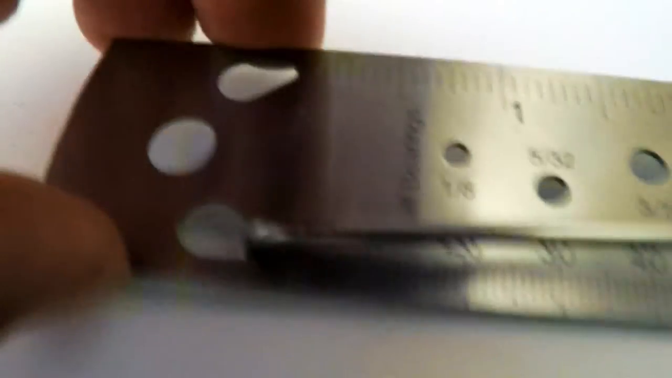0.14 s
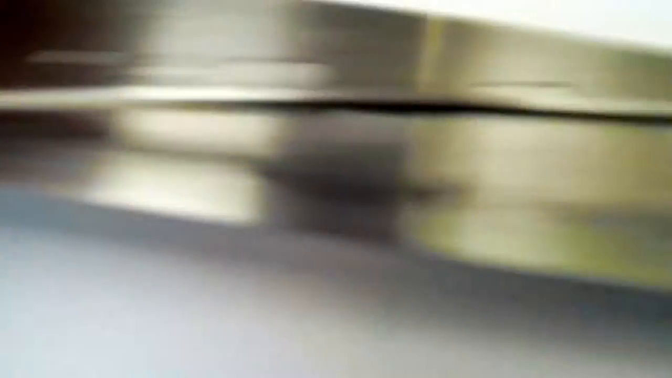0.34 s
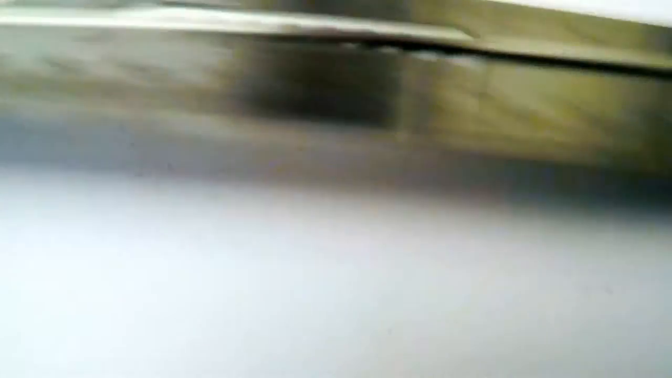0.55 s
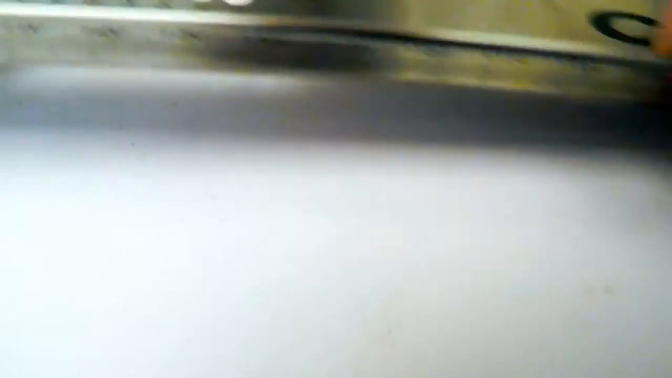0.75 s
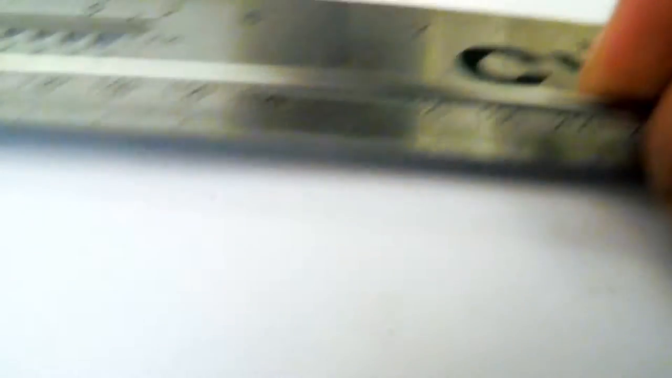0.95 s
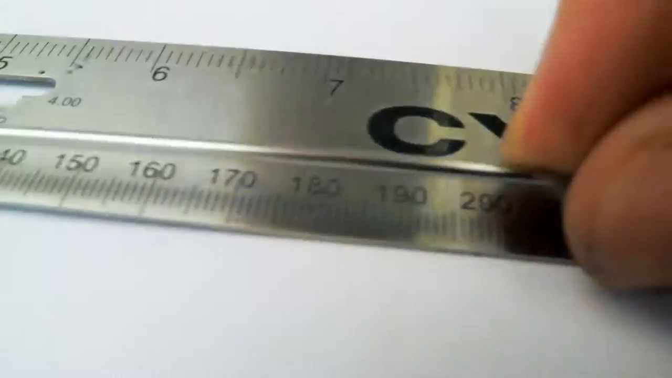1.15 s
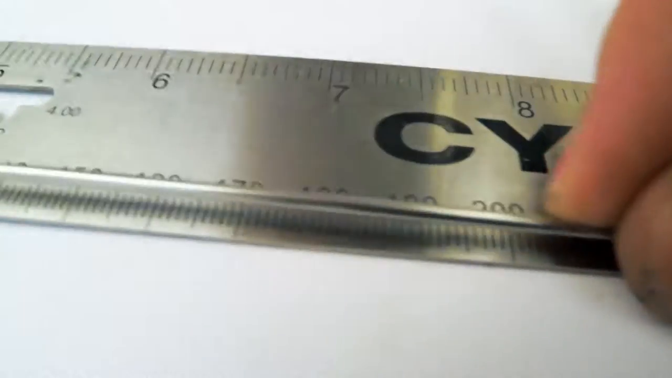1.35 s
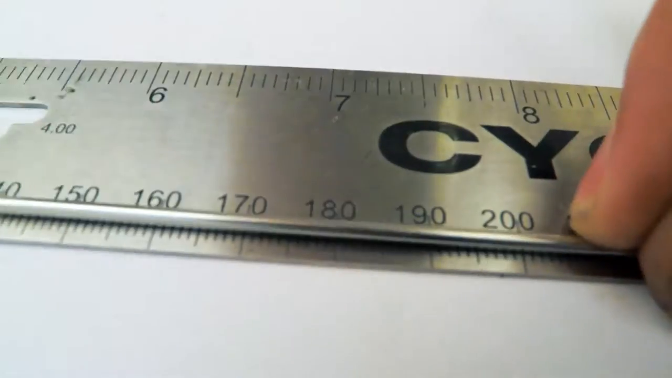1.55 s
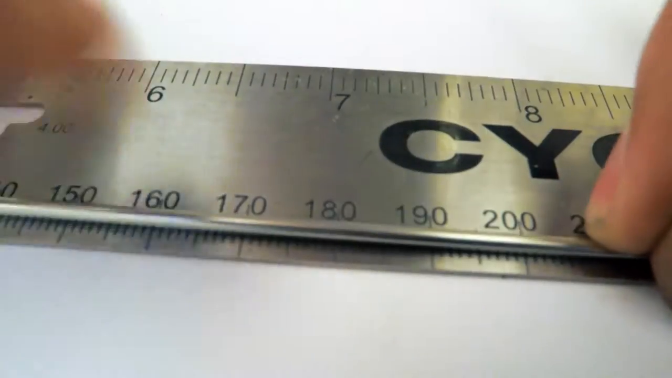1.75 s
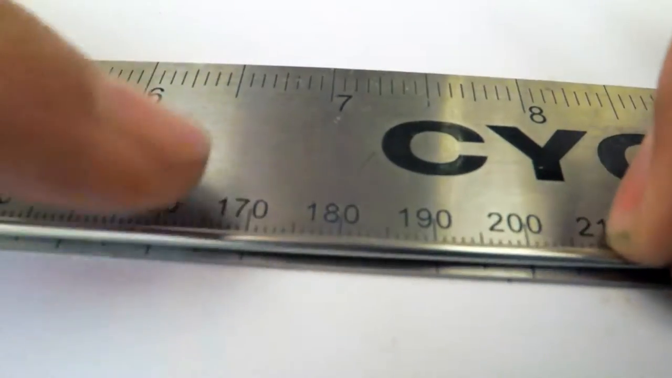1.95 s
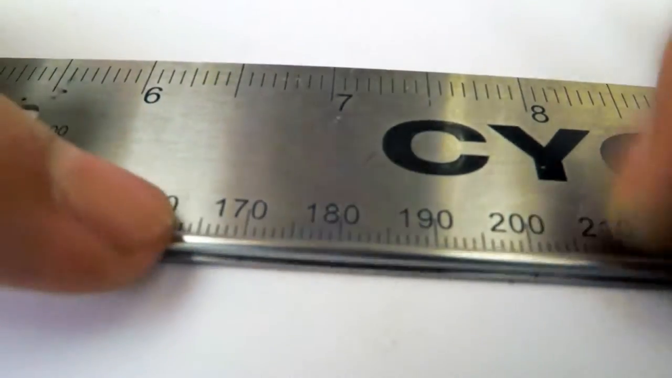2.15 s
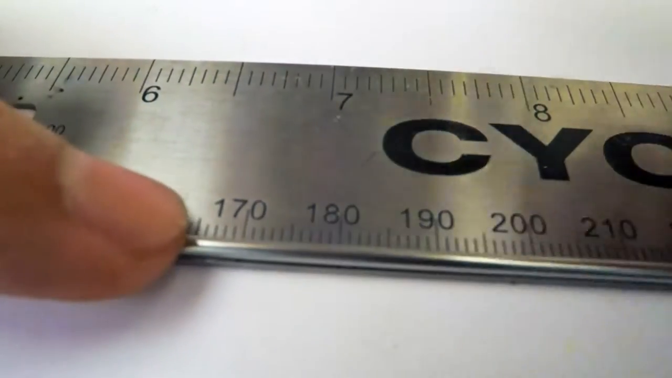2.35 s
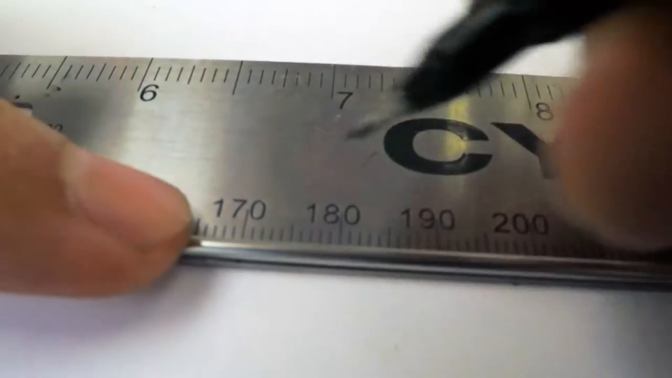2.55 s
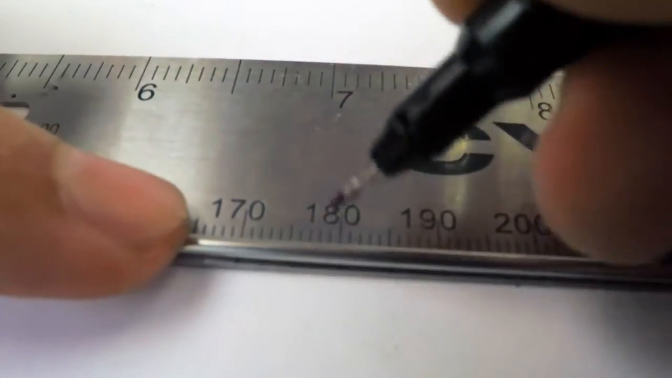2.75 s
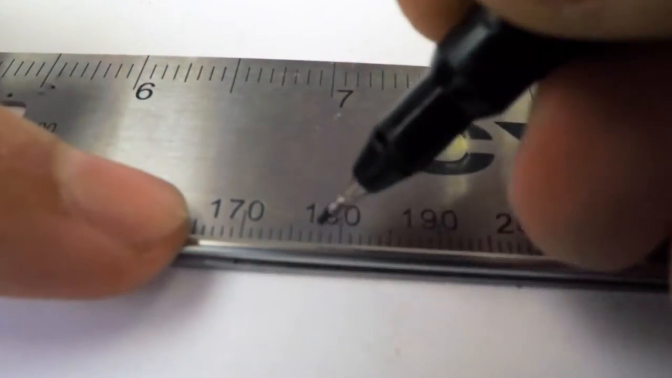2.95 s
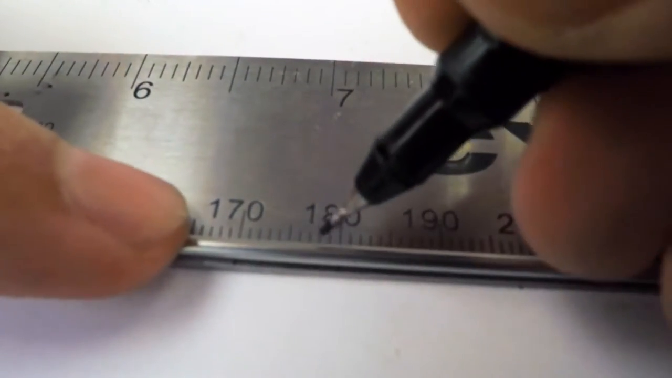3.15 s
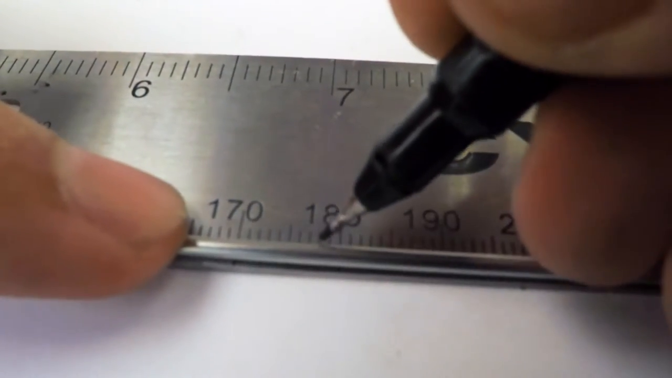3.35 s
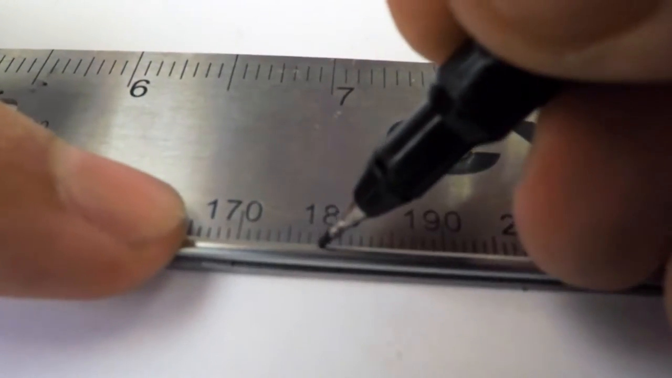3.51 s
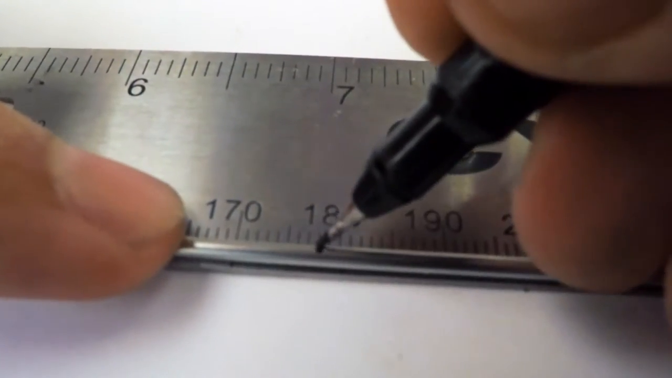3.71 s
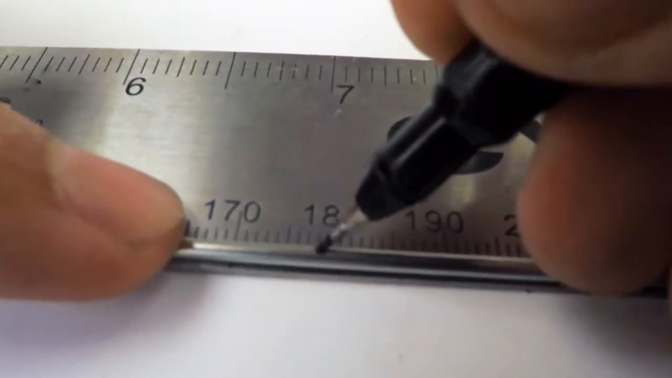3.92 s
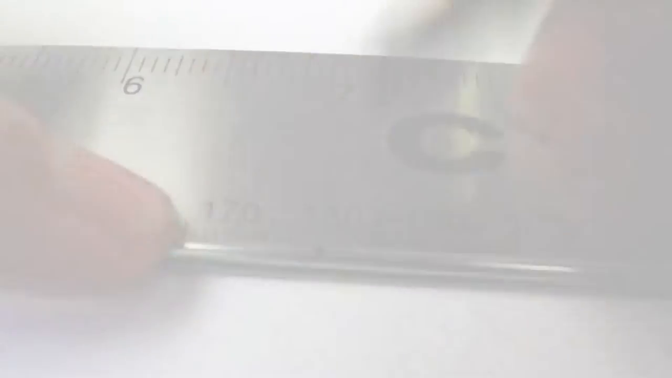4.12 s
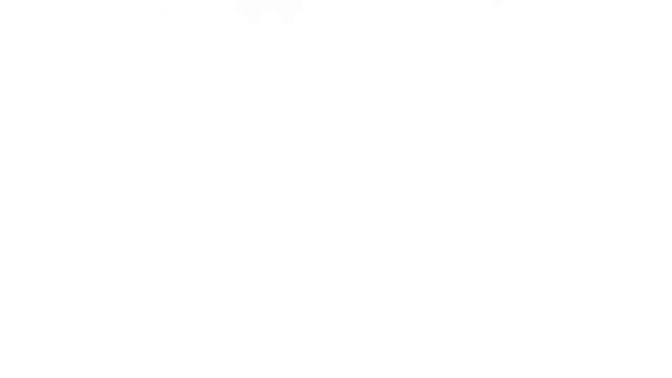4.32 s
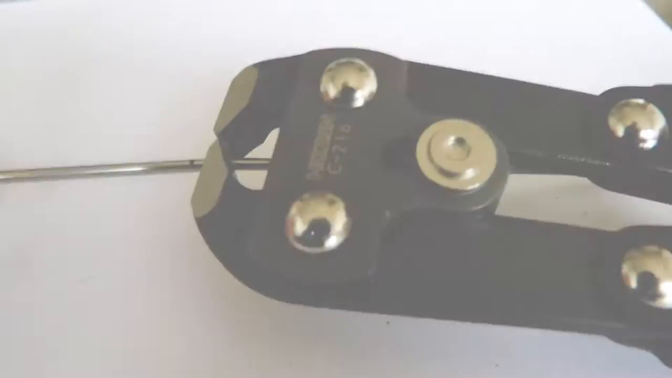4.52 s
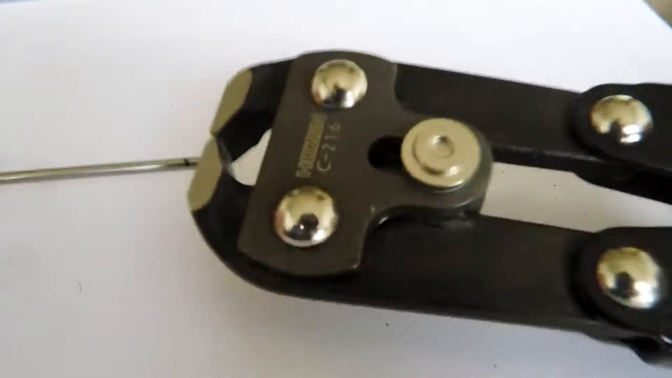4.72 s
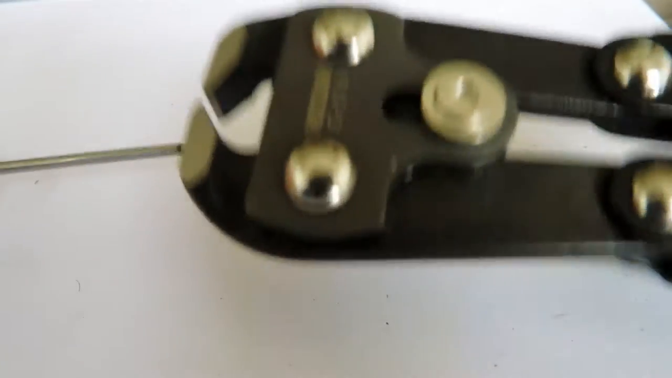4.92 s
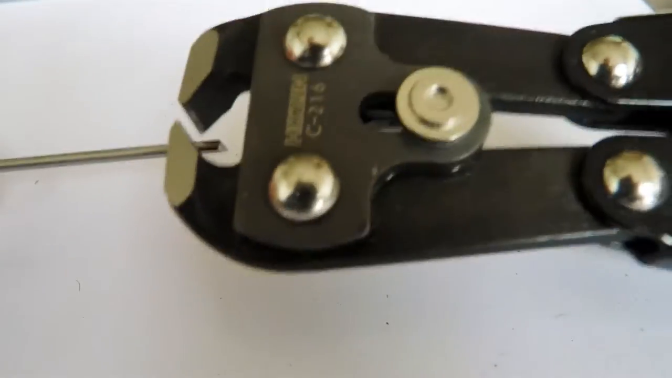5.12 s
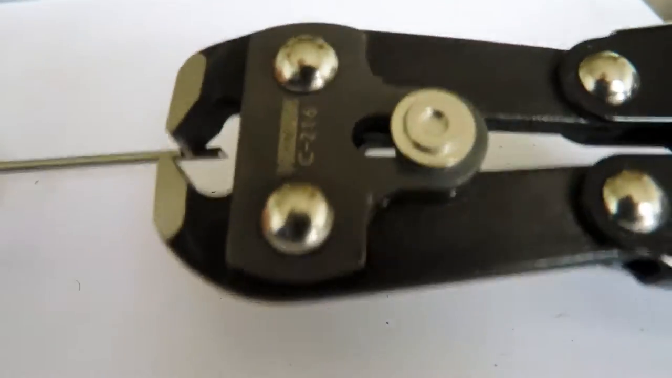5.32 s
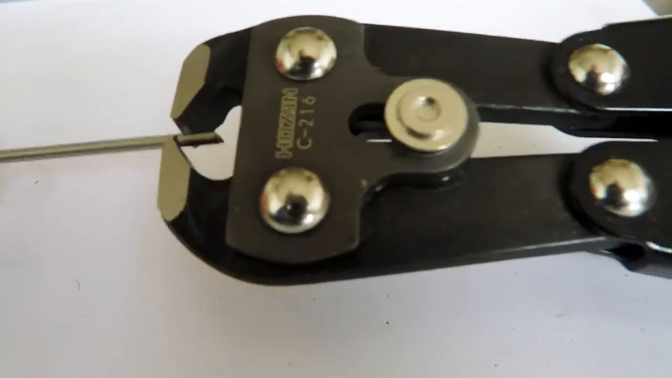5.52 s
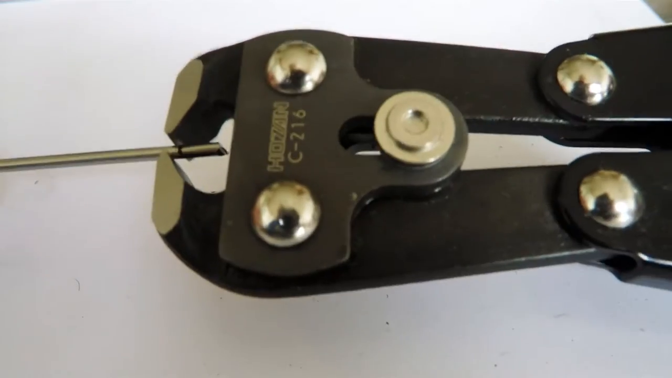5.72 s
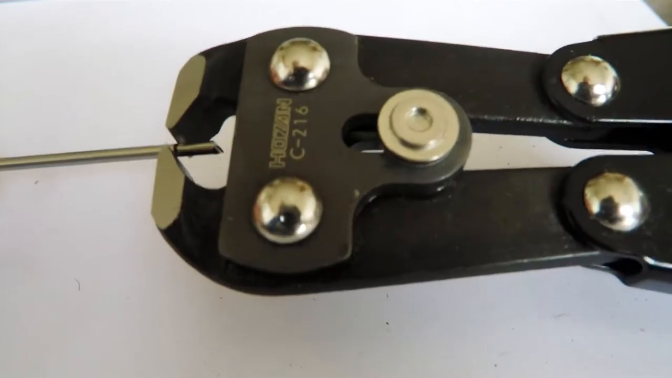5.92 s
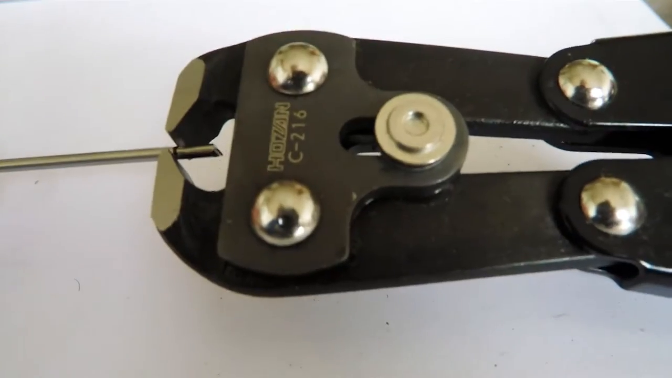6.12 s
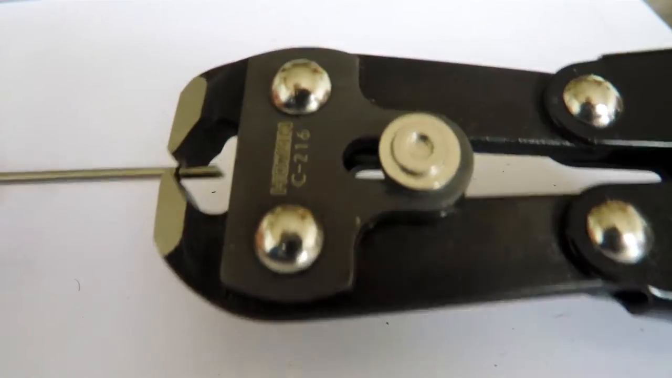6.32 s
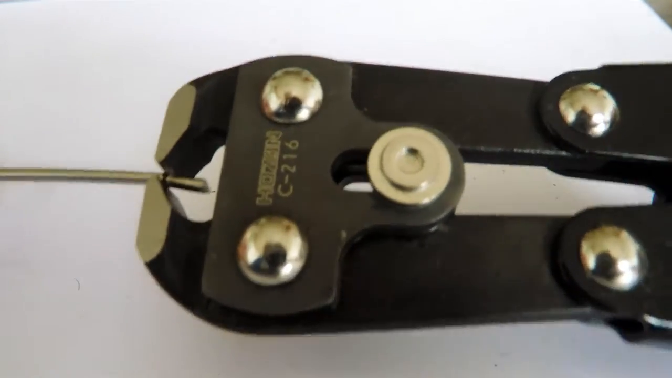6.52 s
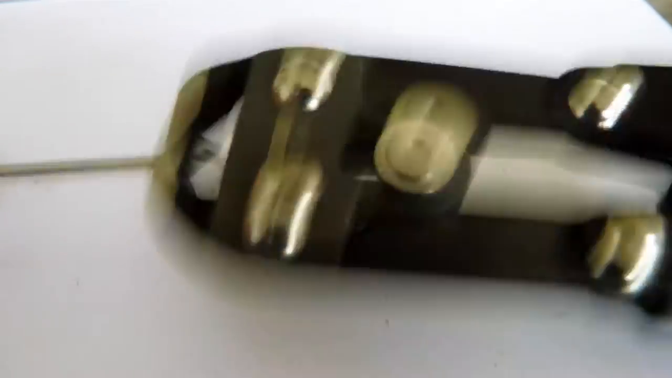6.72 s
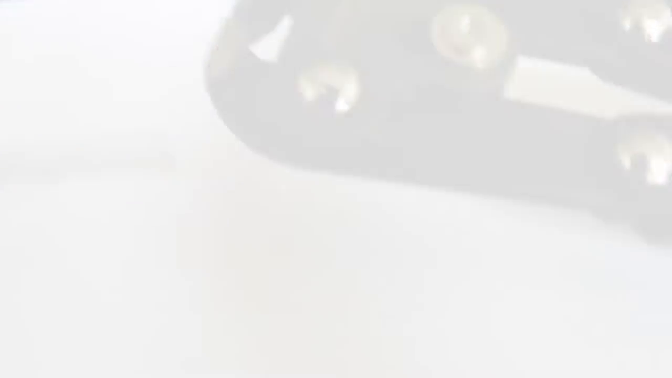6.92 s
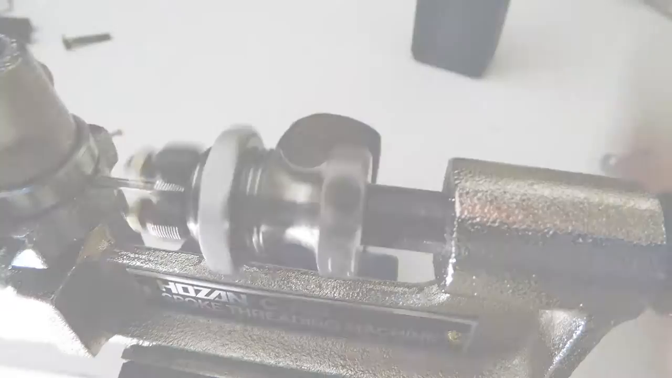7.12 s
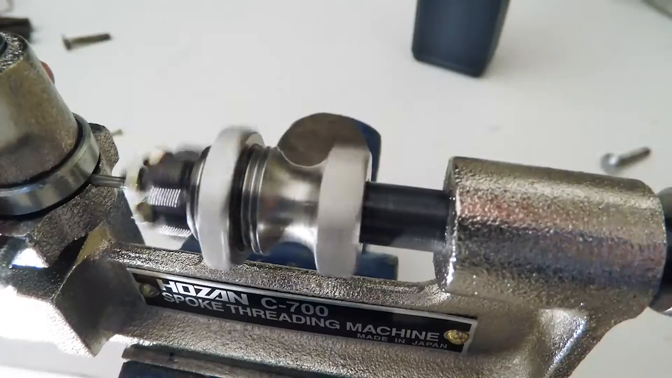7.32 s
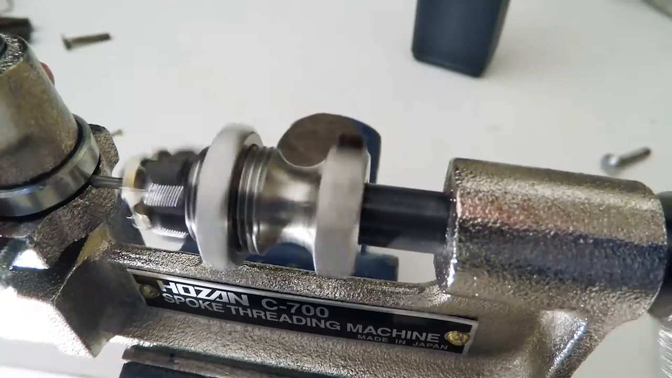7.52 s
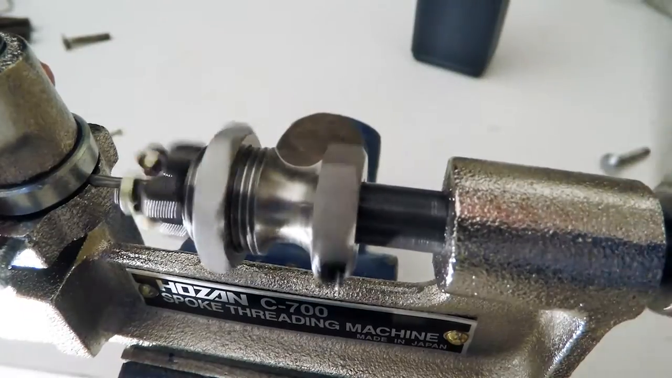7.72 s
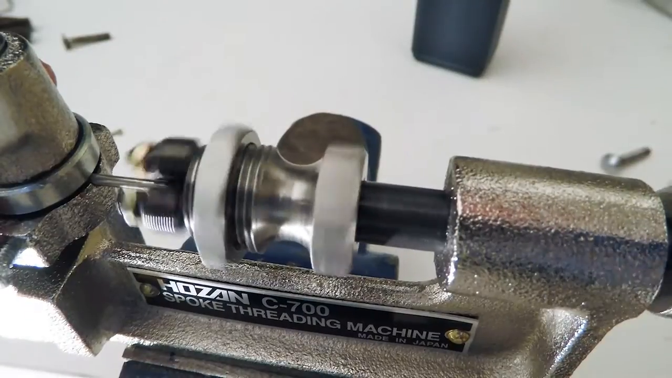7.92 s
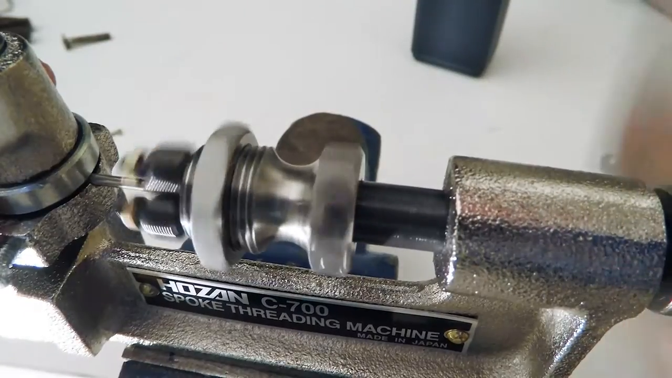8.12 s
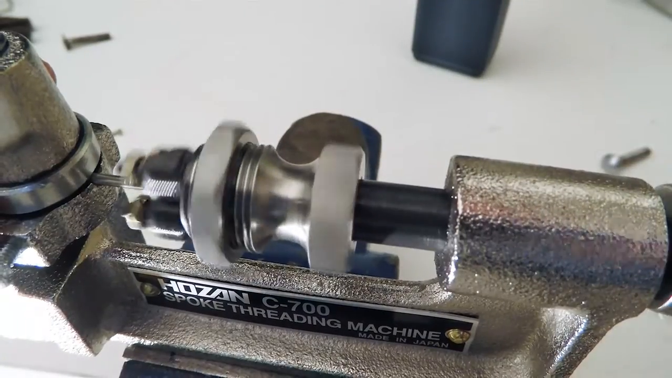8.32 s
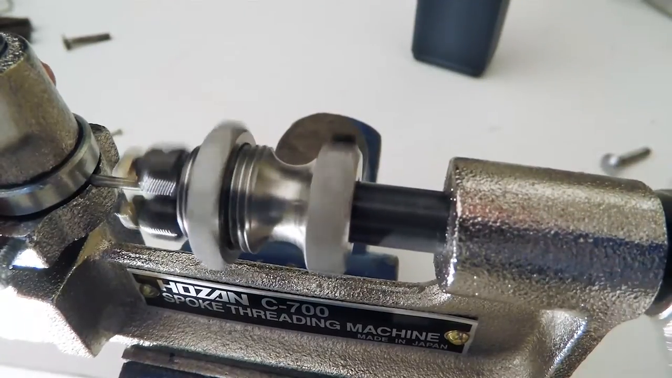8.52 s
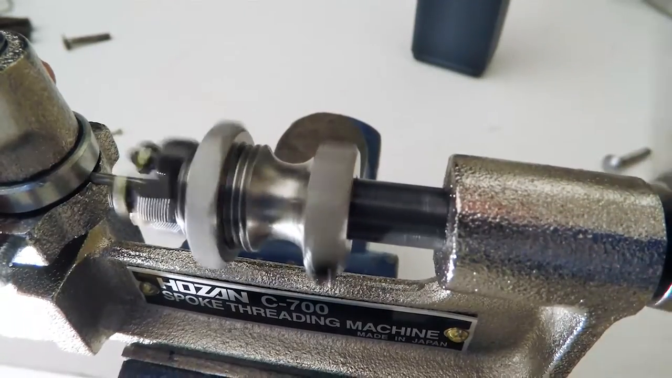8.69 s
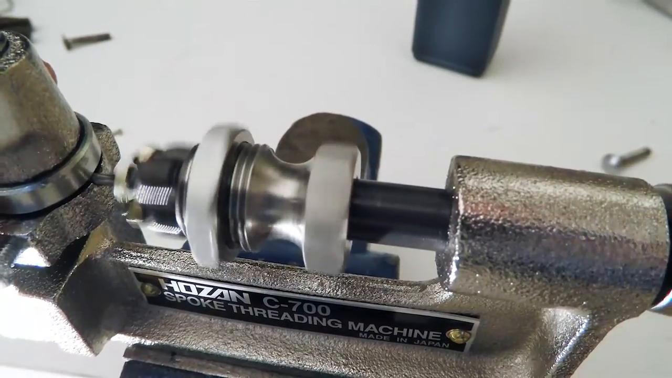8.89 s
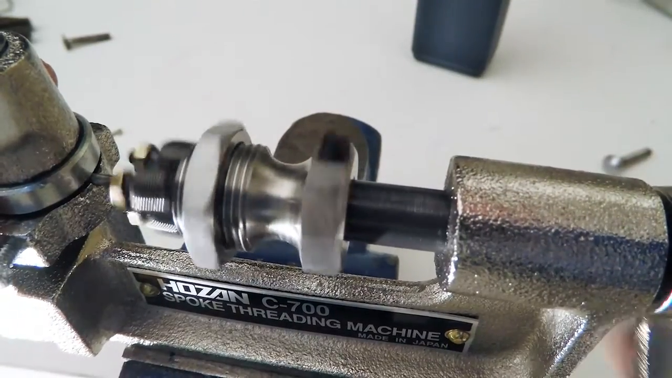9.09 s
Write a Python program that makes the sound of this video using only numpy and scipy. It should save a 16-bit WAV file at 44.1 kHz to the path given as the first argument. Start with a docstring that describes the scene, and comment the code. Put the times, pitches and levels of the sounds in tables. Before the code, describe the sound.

A steel spoke scrapes along a metal rule, a cutter snips it twice with sharp cracks, then a hand-cranked roller softly rumbles and knocks.

```python
"""A steel spoke worked at the bench, close to a small microphone, in three scenes joined by hard cuts.
First it slides and taps along a steel rule, which rings while held up, and is marked with a pen.
Then a cutter creaks and snips it twice; the first offcut bounces away over the hard floor of a live
room. Last, a hand-cranked thread roller rumbles along it and knocks. Throughout, the table sways
under the hands, over faint room tone."""
import sys
import numpy as np
from scipy import signal
from scipy.fft import rfft, irfft, next_fast_len
from scipy.io import wavfile
from scipy.ndimage import uniform_filter1d, map_coordinates

SR = 44100
rng = np.random.default_rng(int(sys.argv[2]) if len(sys.argv) > 2 else 0)


def file_out(sig):
    """Save sig as 16-bit WAV at sys.argv[1]."""
    # one column per channel
    cols = np.atleast_2d(sig).T
    # limit, then scale
    lim = np.clip(cols, -1, 1)
    pcm = np.round(lim * 32767).astype(np.int16)
    wavfile.write(sys.argv[1], SR, pcm)


N = 403515
CUTS_S = (4.366, 7.035)  # rule to cutter, cutter to roller

# dull rumble of a hand tool under load (f/Hz, level/dB)
TOOL_RUMBLE = [(71, -29.5), (120, -1), (183, -9), (289, -9), (383, -15.5), (513, -4.5), (584, -12.5),
               (882, -13), (1360, -29), (1600, -32), (2080, -67.5), (3520, -120)]
# low part of the room's reverberation (f/Hz, level/dB)
ROOM_LOW = [(88, -45.5), (150, -12.5), (249, 0), (487, -7), (703, -6), (792, -12), (901, -6.5), (1600, -33),
            (2080, -57), (3520, -120)]


def spoke_on_rule(laid_down_s=.8, marking_s=(2.45, 4.12)):
    """Close up, friction rings the held rule; lying on the table it is damped and only scuffs."""
    # strokes (t/s, length/s, body level/dB, drift/dB, treble re body/dB, top re treble/dB)
    slides = [(0.0, 0.09, -36.5, -17, -19, -9), (0.103, 0.22, -40.5, -19, -25.5, -0.5),
              (0.393, 0.19, -39.5, 6, -10, -3.5), (0.618, 0.17, -46, -9.5, -10, -2.5),
              (0.836, 0.059, -54.5, 3.5, -0.5, -17), (0.902, 0.16, -52, 0, 2, -11),
              (1.074, 0.088, -50.5, -17, -19, -7), (1.269, 0.24, -58, 5.5, -10, -19),
              (1.546, 0.14, -34, -30, -11.5, -1.5), (1.803, 0.28, -46, -11, -22, -11),
              (2.512, 0.042, -30, -9, -10, 1), (4.271, 0.07, -33, -24.5, -26, 0.5)]
    # short contacts (t/s, body level/dB, treble re body/dB, length/ms)
    taps = [(0.02, -31, -20, 9.6), (0.046, -41.5, -16.5, 26), (0.114, -38.5, -13.5, 42),
            (0.185, -43, -9.5, 55), (0.218, -38.5, -10.5, 25), (0.268, -39, -16.5, 28),
            (0.399, -26.5, -30, 21), (0.445, -39, -13, 11), (0.579, -30.5, -19, 42), (0.655, -54.5, 10, 12),
            (0.702, -49, 6, 15.6), (1.084, -39.5, -27, 7.9), (1.406, -41, -4.5, 6.2), (1.431, -43, -20, 42),
            (1.485, -42.5, -20, 10), (1.525, -36, -14, 4), (1.533, -11.5, -7, 6.6), (1.546, -28, -12, 13.5),
            (1.704, -41.5, -34, 8.2), (1.803, -41.5, -14.5, 22), (1.87, -45, -16, 26),
            (1.923, -35, -19, 24), (1.975, -41, -15.5, 6.3), (1.994, -35.5, -25, 25),
            (2.182, -48.5, -14, 26), (2.234, -53, -20, 5.5), (2.348, -41, -28, 7.9),
            (2.433, -47.5, -31, 6.7), (2.605, -38, -12.5, 9.6), (2.679, -59, -19, 6),
            (2.726, -60, -20, 11.3), (2.829, -49.5, -12, 18.6), (2.861, -37, -23, 8.7),
            (2.878, -34.5, -7, 13.7), (3.162, -57.5, -4.5, 32), (3.296, -48, -19, 31),
            (3.343, -43, -14.5, 20), (3.403, -55, -14, 15), (3.584, -50, -18, 23), (3.763, -44, -11.5, 18),
            (3.799, -52.5, -5, 6), (3.866, -42, -8, 16.5), (3.946, -55.5, -12, 13), (4.003, -48.5, -14, 15),
            (4.027, -47.5, -4, 14.4), (4.072, -44.5, -6.5, 17.4), (4.135, -38, -27, 14.5),
            (4.262, -20.5, -16, 7.5), (4.364, -24, -8, 2.9)]
    # the rule's modes in three bands (f/Hz, width/Hz, level/dB)
    body_modes = [(563, 24, -5.5), (796, 36, 2), (1107, 28, 1), (1434, 28, -9.5), (1710, 110, -21)]
    treble_modes = [(2140, 40, -9.5), (2560, 120, -2.5), (3090, 180, -12), (3490, 31, 1),
                    (4400, 220, -21.5)]
    top_modes = [(5400, 66, -6), (7020, 59, 2), (7980, 110, -7.5), (8470, 140, -7.5), (9600, 130, -9.5),
                 (11500, 44, -10), (13250, 60, -24), (14100, 57, -15), (15400, 200, -18)]
    # steel rubbing steel, in the same bands (f/Hz, level/dB)
    body_grit = [(150, -51), (250, -28), (380, -6.5), (583, -2.5), (961, -3.5), (1300, -5), (2000, -29),
                 (2860, -39), (4840, -120)]
    treble_grit = [(1120, -15.5), (1900, -4.5), (2170, -8.5), (3050, 1), (4070, -12.5), (4400, -20),
                   (5720, -39), (9680, -120)]
    top_grit = [(2470, -50), (4200, -8), (4910, -3.5), (5620, -8), (5810, -3.5), (7990, -9), (9300, -16.5),
                (10800, -15), (11800, -15.5), (12900, -12.5), (16000, -28)]
    # pen tip and fingers scuffing the rule (f/Hz, level/dB)
    pen = [(240, -39), (400, -20), (1090, -3), (1700, -19), (1920, -68), (2200, -28), (2860, -44),
           (4840, -120)]
    fidgets = chance_contacts(2, 3.5, per_s=5, db=-59, scatter_db=2, treble_db=-10, length_ms=16)
    times, tap_db, tap_treble_db, tap_ms = np.transpose(taps + fidgets)
    strokes = np.array([stroke(s, seconds, db, db + drift) for s, seconds, db, drift, *_ in slides])
    band_gains = amp([(0, treble, treble + top) for *_, treble, top in slides]).T
    body_slide, treble_slide, top_slide = band_gains @ strokes
    bands = [(body_slide, tap_db, body_modes, body_grit, pen),
             (treble_slide, tap_db + tap_treble_db, treble_modes, treble_grit, treble_grit),
             (top_slide, tap_db + tap_treble_db - 3, top_modes, top_grit, top_grit)]
    t = np.arange(N) / SR
    held = t < laid_down_s
    marking = (t > marking_s[0]) & (t < marking_s[1])
    out = np.zeros(N)
    for slide, db, modes, rub, scuff in bands:
        env = slide + bursts(zip(times, db, tap_ms), rise=.14)
        out += friction(env * held, lambda x: resonate(x, modes) + amp(-9) * colour(x, rub), patchy_db=5)
        out += friction(env * (~held & ~marking), lambda x: colour(x, rub), patchy_db=2.5)
        out += friction(env * marking, lambda x: colour(x, scuff), patchy_db=2.5)
    return out


def spoke_squeal():
    """The sliding spoke sings briefly on one pitch."""
    # the sung note (t/s, length/s, f/Hz, level/dB)
    squeals = [(.485, .07, 3490, -40)]
    out = np.zeros(N)
    for s, seconds, hz, db in squeals:
        t = np.arange(round(seconds * SR)) / SR
        swell = np.sin(np.pi * t / seconds) ** .6
        add(out, s, amp(db) * swell * np.sin(2 * np.pi * hz * t))
    return out


def cutter_creak(gap_s=.0112, jitter=.12, miss_chance=.12, scatter_db=3, slip_ms=4.2):
    """The loaded pivot sticks and slips almost evenly, missing a few, over a low sound of strain."""
    # hands closing the cutter (start t/s, end t/s, creak start/dB, end/dB, strain start/dB, end/dB)
    squeezes = [(4.37, 4.625, -53.5, -50.5, -50, -49.5), (6.55, 6.738, -58, -52, -52, -45)]
    # the pivot's resonances (f/Hz, width/Hz, level/dB)
    pivot = [(1550, 120, -7.5), (2660, 180, -0.5), (3067, 50, -2.5), (3470, 190, -4), (4470, 110, -0.5),
             (5185, 110, 0)]
    slips, strain = [], np.zeros(N)
    for start, end, first_db, last_db, *strain_db in squeezes:
        gap, size, luck = rng.random((40, 3)).T
        times = start + gap_s * np.cumsum(1 + 2 * jitter * (2 * gap - 1))
        levels = np.interp(times, [start, end], [first_db, last_db]) + scatter_db * (2 * size - 1)
        sounding = (times < end) & (luck > miss_chance)
        slips += [(s, db, slip_ms) for s, db in zip(times[sounding], levels[sounding])]
        strain += stroke(start, end - start, *strain_db)
    creak = friction(bursts(slips, rise=.079), lambda x: resonate(x, pivot), patchy_db=.5)
    return creak + friction(strain, lambda x: colour(x, TOOL_RUMBLE), patchy_db=3.5)


def cutter_snips():
    """Each snip cracks near the microphone, rings the cutter, thumps the table and fills the room."""
    # jaws break through, handles slam, parts rebound (t/s, crack/dB, knock/dB, clink/dB, table/dB, room/dB)
    blows = [(4.6368, 1.5, -14, -18, -51, -22), (4.6457, -13.5, -8.5, -3, -13.5, -46),
             (6.7572, -4, -8, -10, -36, -25), (6.7635, -18, -5, -20, -8.5, -31),
             (6.8455, -36, -40, -16, -46, -44), (6.887, -43, -43, -51, -63, -53.5)]
    # the steel breaking, and the room's bright answer (f/Hz, level/dB)
    crack_spectrum = [(240, -35), (400, -8), (1030, 0.5), (1870, -23.5), (2590, 0), (5350, -3), (6540, 0),
                      (8500, -10.5), (14400, -17.5), (16000, -39)]
    room_high = [(760, -39), (1300, -8.5), (1670, -17.5), (2290, -1.5), (3350, -3.5), (3640, -2),
                 (5200, -2), (5660, -7), (7430, -1.5), (8340, -10.5), (14600, -19.5), (15500, -27),
                 (16000, -52.5)]
    # modes of the struck parts (f/Hz, level/dB, t60/s)
    blades = [(2660, -5, .028), (3620, -11, .025), (4330, -12, .022), (5200, -13, .03), (6680, -12, .022)]
    jaws = [(683, 8, 0.023), (902, -1, 0.029), (430, -12.5, .04)]
    handles = [(1300, -5, .014), (2060, 0, .014), (2700, -8, .02), (3500, -12, .015), (4320, -5, .012),
               (5190, -10, .015)]
    lingering_ring = [(5190, -28, .4)]
    table_top = [(59, 0, .3), (119, -14, .5), (190, -10, .35), (290, -19, .3)]
    t = np.arange(SR // 20) / SR
    crack_env = (1 - np.exp(-t / .00029)) * np.exp(-(t / .0037) ** 4.1)
    out = np.zeros(N)
    for s, crack_db, knock_db, clink_db, table_db, room_db in blows:
        add(out, s, amp(crack_db) * noise(crack_spectrum, len(t)) * crack_env)
        add(out, s, amp(crack_db) * ring(blades, .08, scatter_db=2.5, attack_s=.0004))
        add(out, s, amp(knock_db) * ring(jaws, .1, scatter_db=.2, attack_s=.00056))
        add(out, s, amp(clink_db) * ring(handles, .1, scatter_db=2, attack_s=.00034))
        add(out, s, amp(clink_db) * shimmer(lingering_ring, seconds=.5))
        add(out, s + .003, amp(table_db) * ring(table_top, .7, scatter_db=.5, attack_s=.008))
        add(out, s, amp(room_db) * room_tail(room_high, .8, rise_s=.0011))
        add(out, s, amp(room_db - 1.5) * room_tail(ROOM_LOW, .8, rise_s=.0035))
    return out


def offcut(at_rest_s=6.4, damping_db_per_s=150):
    """The stub flies off ringing until it lies still; its far bounces are mostly room and a tick."""
    # the snip sets the stub ringing, then it bounces on the floor
    # (t/s, room level/dB, thud re room/dB, ring re room/dB, tick re room/dB)
    blows = [(4.64, -34, -24, 1.5, -20), (5.197, -26, -1.9, -2, 7), (5.489, -61.5, 17, -13.5, 3),
             (5.662, -34, 0, 2, 2), (5.930, -38.5, -1.2, -18.5, 15), (5.958, -38, 0.5, -1, 19.5),
             (6.008, -48, -8, -1.2, 17), (6.120, -40, -2.5, 4, 19.5), (6.197, -43, -3.5, 0, 17.5)]
    # modes of the stub's ring and of its short tick (f/Hz, level/dB, t60/s)
    stub = [(8960, -13.5, 0.68), (14530, -5, 0.49)]
    tick = [(2770, 5, 0.011), (12600, -19.5, .012)]
    # the room's bright answer to each blow (f/Hz, level/dB)
    room_high = [(760, -39.5), (1300, -16.5), (1590, -21.5), (2520, 0), (4040, -7.5), (5900, -6.5),
                 (8430, -17.5), (10500, -14), (12500, -12.5), (13700, -12), (15000, -23), (15600, -44),
                 (16000, -71.5)]
    # four last bounces, each sooner and weaker
    rattle_times = blows[-1][0] + np.cumsum(.054 * .85 ** np.arange(4))
    rattle = [(s, -48.5 - 2.5 * k, -1.5, -1, 18.5) for k, s in enumerate(rattle_times)]
    out, ringing = np.zeros(N), np.zeros(N)
    for s, room_db, thud_db, ring_db, tick_db in blows + rattle:
        add(out, s, amp(room_db) * room_tail(room_high, .7, rise_s=.0015))
        add(out, s, amp(room_db + thud_db) * room_tail(ROOM_LOW, .7, rise_s=.0025))
        add(ringing, s, amp(room_db + ring_db) * shimmer(stub, seconds=.9))
        add(out, s + .0035, amp(room_db + tick_db) * ring(tick, .05, scatter_db=1.25, attack_s=.001))
    rested_s = np.maximum(np.arange(N) / SR - at_rest_s, 0)
    return out + ringing * amp(-damping_db_per_s * rested_s)


def thread_roller(rumble_db=-57.5, hiss_db=-73):
    """The dies rumble and hiss along the spoke; slack in the crank knocks now and then."""
    # play in the crank (t/s, body level/dB, treble re body/dB, length/ms)
    knocks = [(7.089, -46, -26.5, 17), (7.111, -44, -24.5, 19), (7.412, -45, -10, 30),
              (7.742, -42.5, -15.5, 17), (7.812, -50.5, -18.5, 28), (7.834, -48.5, -21.5, 12.6),
              (8.106, -47, -22.5, 31), (8.997, -43, -12.5, 28), (9.047, -52.5, -16, 24),
              (9.082, -34, -27, 13.4), (9.102, -42.5, -24.5, 30)]
    # hiss of the rolling dies (f/Hz, level/dB)
    hiss = [(820, -22), (1400, -11), (1750, -1), (1960, 6.5), (2710, 2), (3300, -8.5), (4430, 4),
            (5640, -23), (9000, -50), (11700, -50), (19800, -120)]
    turning = np.arange(N) / SR > CUTS_S[1]
    faint_knocks = chance_contacts(7.1, 9, per_s=4, db=-59, scatter_db=1.5, treble_db=-14, length_ms=22)
    times, db, treble_db, ms = np.transpose(knocks + faint_knocks)
    low_env = amp(rumble_db) * turning + bursts(zip(times, db, ms), rise=.027)
    high_env = amp(hiss_db) * turning + bursts(zip(times, db + treble_db, .46 * ms), rise=.39)
    rumble = friction(low_env, lambda x: colour(x, TOOL_RUMBLE), patchy_db=1.5)
    return rumble + friction(high_env, lambda x: colour(x, hiss), patchy_db=1.5)


def table_sway(wobble_db=2.5, wobbles_per_s=5):
    """The top sways on its legs under the hands; harder jolts set it swinging."""
    # the table's movement (t/s, sway level/dB, thud level/dB)
    movement = [(0.0, -56, -60), (0.99, -54.5, -62.5), (1.6, -48.5, -61), (2.32, -53.5, -63.5),
                (2.57, -45.5, -57), (2.75, -49, -61), (3.24, -51, -63), (3.82, -43, -65.5),
                (4.36, -56.5, -62), (4.64, -40, -45), (4.99, -50, -59.5), (5.99, -59, -64),
                (6.55, -54, -60), (6.86, -41.5, -44.5), (7.13, -47.5, -56), (8.44, -53.5, -63),
                (8.77, -43.5, -52.5), (9.15, -54, -65)]
    # its deep sway and its thud (f/Hz, level/dB)
    sway_band = [(12, -16.5), (24, 3.5), (35, -3), (55, -3.5), (80, -11.5), (110, -68)]
    thud_band = [(50, -26), (85, 7), (140, 0), (200, -3), (300, -49.5)]
    # jolts (t/s, level/dB, f/Hz, t60/s, pushed up +1 or down -1)
    jolts = [(2.572, -29.5, 29.5, 1, -1), (2.861, -23, 50.1, 0.12, -1), (2.878, -32, 30, 1, -1),
             (3.872, -18, 47, 0.15, -1), (4.028, -19, 48, .12, 1), (7.39, -33.5, 28.3, 0.15, -1),
             (7.64, -23, 48.07, 0.12, -1), (8.613, -17, 42.15, 0.08, 1), (8.639, -10.5, 52, 0.081, 1),
             (8.882, -22, 46.9, 0.067, -1), (8.921, -13, 48.07, 0.099, 1)]
    t = np.arange(N) / SR
    times, sway_db, thud_db = np.transpose(movement)
    drift_db = wobble_db * map_coordinates(rng.standard_normal(128), [t * wobbles_per_s])
    out = amp(np.interp(t, times, sway_db) + drift_db) * noise(sway_band, N)
    out += amp(np.interp(t, times, thud_db) + drift_db) * noise(thud_band, N)
    for s, db, hz, t60, direction in jolts:
        add(out, s, direction * amp(db) * ring([(hz, 0, t60)], .6, scatter_db=0, attack_s=.013))
    return out


def room_tail(spectrum, seconds, rise_s):
    """The live room answers one blow: each frequency dies at its own speed."""
    # reverberation time (f/Hz, t60/s)
    room_t60 = [(150, 0.3), (700, 0.52), (2500, 0.52), (6000, .45), (12800, 0.32)]
    hz, t, bins = signal.stft(rng.standard_normal(round(seconds * SR)), SR, nperseg=256)
    db = along(spectrum, hz)[:, None] - 60 * t / along(room_t60, hz)[:, None]
    tail = signal.istft(bins * amp(db), SR, nperseg=256)[1]
    tail *= 1 - np.exp(-np.arange(len(tail)) / SR / rise_s)
    return tail / np.std(tail[:SR // 30])


def room_tone(scene_index):
    """Faint steady noise behind the bench, at its own level in each scene."""
    # room tone of the first scene and of the later two (f/Hz, level/dB)
    first = [(59, -27), (100, -10), (177, -18), (234, -2), (308, -11), (536, -12), (1150, -14.5),
             (1310, -20.5), (1880, -22.5), (6710, -26), (8660, -30.5), (15000, -32.5), (16000, -41)]
    later = [(120, -45), (200, -14), (240, -19), (299, -4.5), (463, -15.5), (631, -4), (1050, -17),
             (4520, -22.5), (15600, -36)]
    # room tone, scene by scene (level/dB)
    levels = [-62, -59.5, -62]
    return amp(levels)[scene_index] * np.where(scene_index == 0, noise(first, N), noise(later, N))


def friction(env, body, patchy_db, rough_db=2, catches_per_s=400):
    """Rough faces catch and drive a body, at unit gain; the colour drifts as the contact moves."""
    sounding = np.flatnonzero(env > 1e-7)
    start, end = sounding[0], min(sounding[-1] + SR // 10, N)
    size = end - start
    catches = amp(rough_db * wander(size, catches_per_s))
    bins = signal.stft(rng.standard_normal(size) * catches, nperseg=512)[2]
    patches = uniform_filter1d(rng.standard_normal(bins.shape), size=4, axis=0)
    patches = unit(uniform_filter1d(patches, size=9, axis=1))
    grit = unit(signal.istft(bins * amp(patchy_db * patches), nperseg=512)[1][:size])
    return np.pad(body(env[start:end] * grit) / np.std(body(grit)), (start, N - end))


def stroke(start, seconds, first_db, last_db, attack_s=.004, release_db_per_s=400):
    """Envelope of one push: quick attack, a steady drift in level, then release."""
    env = np.zeros(N)
    t = np.arange(round((seconds + .25) * SR)) / SR
    db = np.interp(t, [0, seconds], [first_db, last_db]) - release_db_per_s * np.maximum(t - seconds, 0)
    add(env, start, amp(db) * (1 - np.exp(-t / attack_s)))
    return env


def bursts(contacts, rise):
    """Envelope of contacts (t/s, level/dB, length/ms); the rise is a share of the length."""
    env = np.zeros(N)
    ms = np.arange(SR // 8) / SR * 1000
    for s, db, length in contacts:
        add(env, s, amp(db) * (1 - np.exp(-ms / (rise * length))) * np.exp(-(ms / length) ** 1.8))
    return env


def chance_contacts(start, end, per_s, db, scatter_db, treble_db, length_ms):
    """Contacts at random moments (t/s, body level/dB, treble re body/dB, length/ms)."""
    when, size, tone, span = rng.random((64, 4))[:round(per_s * (end - start))].T
    range_db = np.sqrt(12) * scatter_db
    return list(zip(start + (end - start) * when, db + range_db * (size - .5),
                    treble_db + range_db * (tone - .5), length_ms * (.5 + span)))


def ring(modes, seconds, scatter_db, attack_s):
    """A struck part: damped sines, their strengths scattered anew at each blow."""
    t = np.arange(round(seconds * SR)) / SR
    tones = sum(amp(db + scatter_db * rng.standard_normal() - 60 * t / t60) * np.sin(2 * np.pi * hz * t)
                for hz, db, t60 in modes)
    return tones * (1 - np.exp(-t / attack_s))


def shimmer(modes, seconds):
    """A ring heard through the room flutters: each mode is unsteady in strength and phase."""
    t = np.arange(round(seconds * SR)) / SR
    out = 0
    for hz, db, t60 in modes:
        in_phase = (.3 + wander(len(t), hz / 70)) * np.sin(2 * np.pi * hz * t)
        quadrature = wander(len(t), hz / 70) * np.cos(2 * np.pi * hz * t)
        out += amp(db - 60 * t / t60) * (in_phase + quadrature)
    return out * (1 - np.exp(-t / .006))


def resonate(x, modes):
    """x through resonances (f/Hz, width/Hz, level/dB) of alternating sign."""
    return filtered(x, lambda f: sum((-1) ** k * amp(db) * 1j * f * width / (hz**2 - f**2 + 1j * f * width)
                                     for k, (hz, width, db) in enumerate(modes)))


def wander(size, per_s):
    """A smooth curve through per_s random values a second."""
    return map_coordinates(rng.standard_normal(int(size * per_s / SR) + 4), [np.arange(size) * per_s / SR])


def noise(spectrum, size):
    return unit(colour(rng.standard_normal(size), spectrum))


def colour(x, spectrum):
    return filtered(x, lambda hz: amp(along(spectrum, hz)))


def filtered(x, response):
    """x through a complex response of frequency."""
    size = next_fast_len(len(x) + 8192)
    return irfft(rfft(x, size) * response(np.fft.rfftfreq(size, 1 / SR)), size)[:len(x)]


def along(points, hz):
    """Interpolate (f/Hz, value) points on a log frequency axis."""
    f, values = np.transpose(points)
    return np.interp(np.log(hz + 1), np.log(f + 1), values)


def amp(db):
    return 10 ** (np.asarray(db) / 20)


def unit(x):
    return x / np.sqrt(np.mean(x ** 2) + 1e-20)


def add(track, s, x):
    i = round(s * SR)
    track[i:i + len(x)] += x[:N - i]


def scene():
    """Rule, cutter and roller in turn at one microphone, each stopping dead as the next begins."""
    scene_index = np.searchsorted(CUTS_S, np.arange(N) / SR)
    out = room_tone(scene_index) + table_sway()
    out += (scene_index == 0) * (spoke_on_rule() + spoke_squeal())
    out += (scene_index == 1) * (cutter_creak() + cutter_snips() + offcut())
    out += thread_roller()
    return out[None]


def record(dry, ceiling=.8, top_hz=16000):
    """This close, the loudest cracks clip softly; nothing is kept above the band limit."""
    clipped = dry[0] / (1 + np.abs(dry[0] / ceiling) ** 6) ** (1 / 6)
    return filtered(clipped, lambda hz: hz < top_hz)[None]


dry = scene()
out = record(dry)
file_out(out)
```